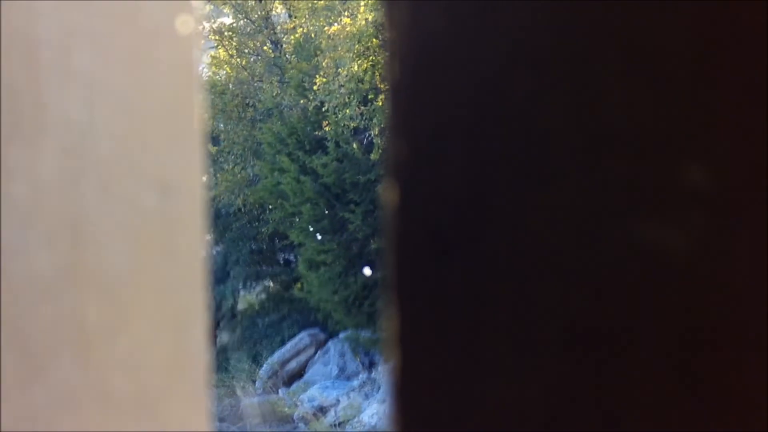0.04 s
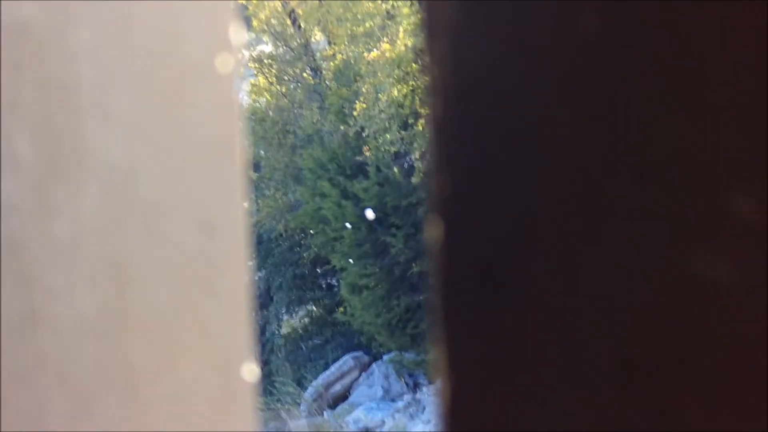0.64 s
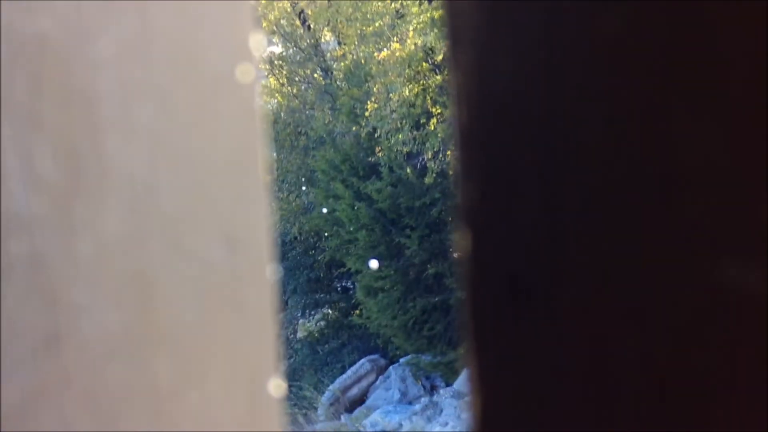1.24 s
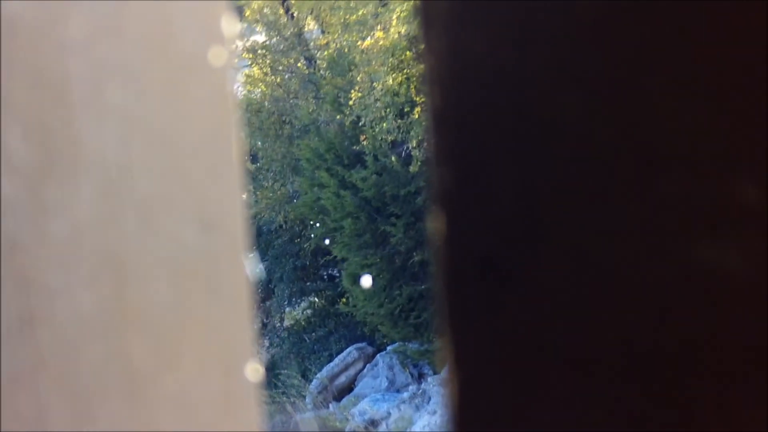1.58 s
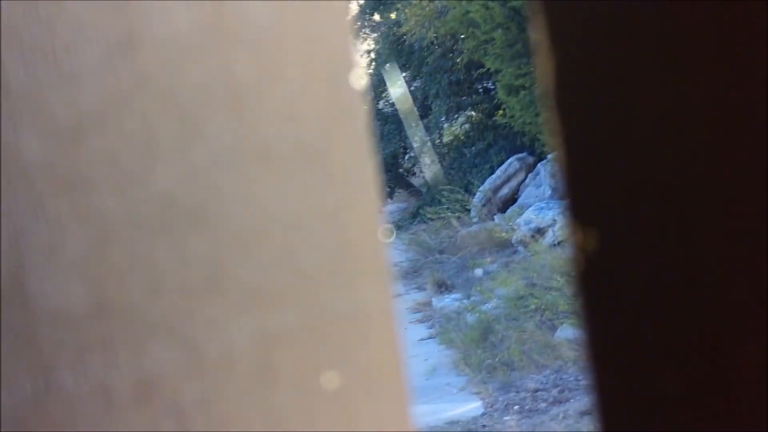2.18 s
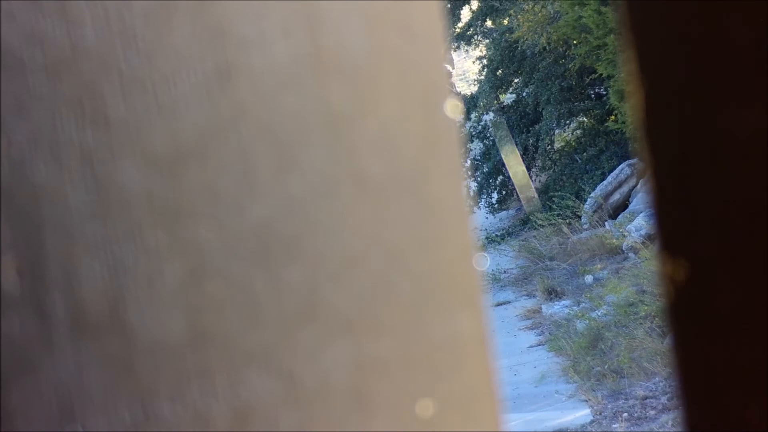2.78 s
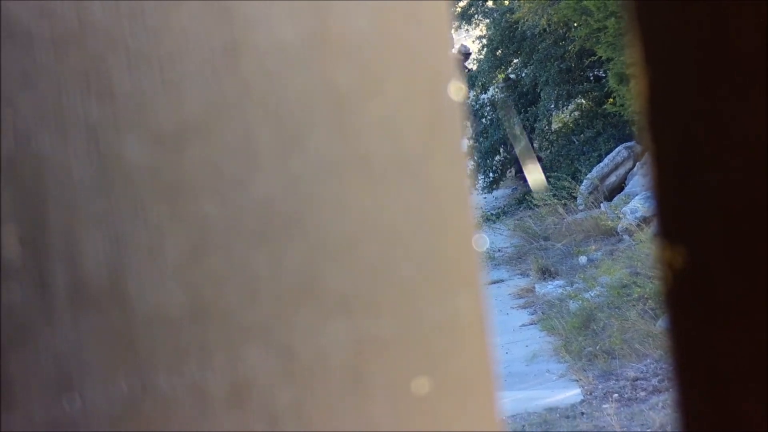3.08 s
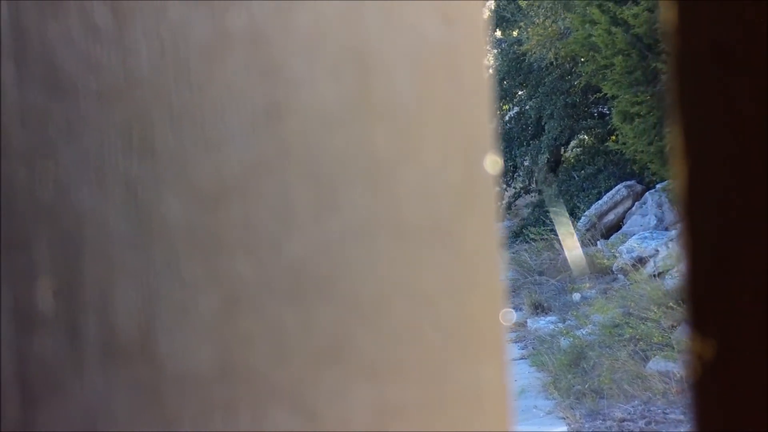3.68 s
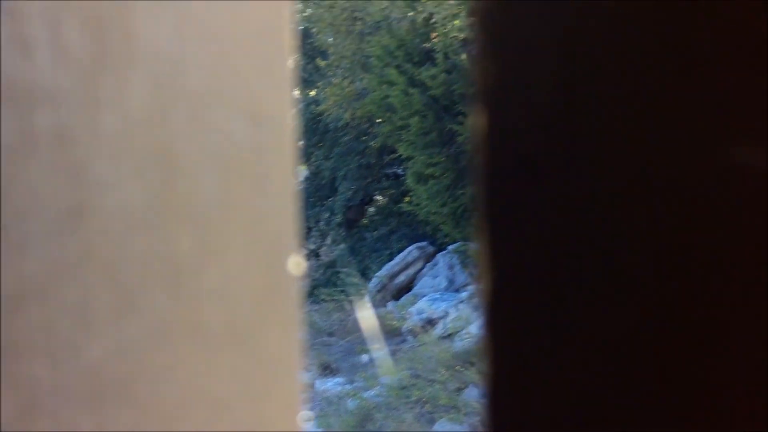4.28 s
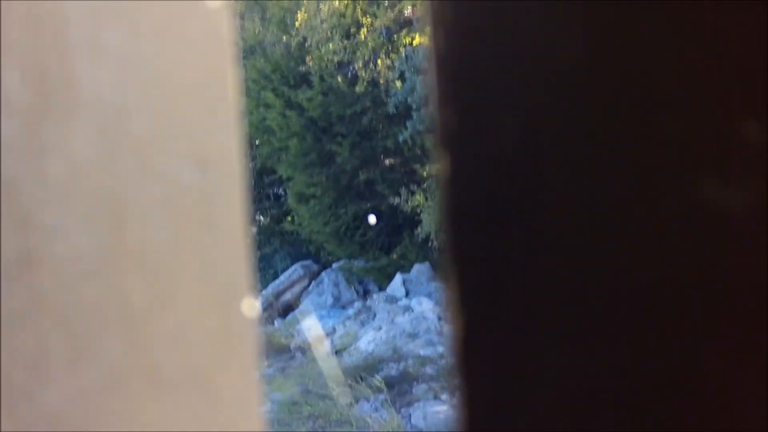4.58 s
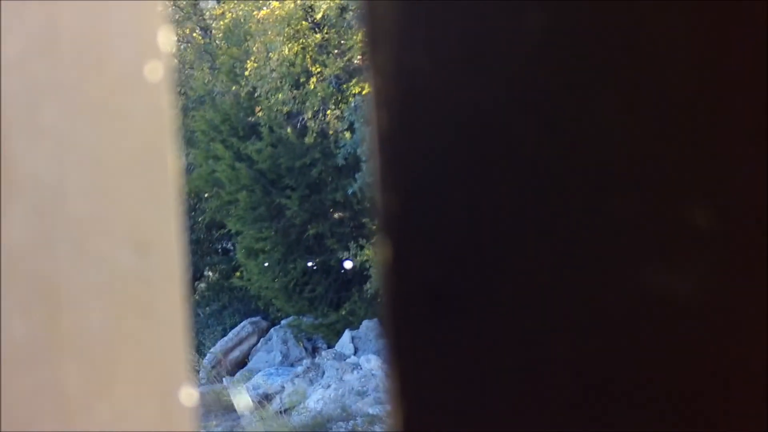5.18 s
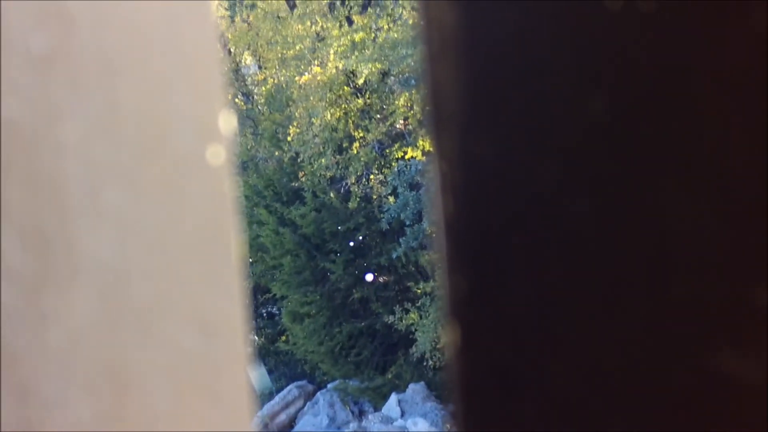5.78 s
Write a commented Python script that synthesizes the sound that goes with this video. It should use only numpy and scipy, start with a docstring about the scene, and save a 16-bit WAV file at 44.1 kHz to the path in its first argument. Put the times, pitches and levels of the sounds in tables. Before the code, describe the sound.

Close, muffled full-auto fire from an electric airsoft gun stops, distant shots patter through the building, then the near gun fires again.

```python
"""An electric airsoft gun is firing full-auto out of a bare room, beside a muffled camera microphone.
Each cycle the gears wind the spring, the piston slides and slams, the body rings and a puff of air
thumps the microphone. At 1.7 s the burst ends and the motor coasts down.
From 2 s other guns rattle far off in the building, with a faint falling motor whine.
At 4.5 s the near gun fires a second long burst, to the end."""
import sys
import numpy as np
from scipy import signal
from scipy.fft import rfft, irfft
from scipy.io import wavfile
from scipy.ndimage import uniform_filter1d, minimum_filter1d

SR = 44100
rng = np.random.default_rng(int(sys.argv[2]) if len(sys.argv) > 2 else 0)


def transcribe(u):
    """Save the signal u as a 16-bit wav file named by the first command-line argument.

    u: samples, shape (n,) or (channels, n), limited to [-1, 1]; the rate is SR.
    q: integer samples, one column per channel.
    """
    v = np.clip(np.atleast_2d(u).T, -1, 1)
    q = np.round(v * 32767).astype(np.int16)
    wavfile.write(sys.argv[1], SR, q)


N = 266364
LEAD = SR // 2  # samples before 0 s: the gun is already firing
TIME = np.arange(-LEAD, N) / SR

# near bursts: (first strike [s], base cycle [s], shots [count])
NEAR_BURSTS = [(-.3757, .08654, 25), (4.5223, .08451, 18)]


def strikes(first_s, cycle_s, count, first_extra_s=.0157, sag_s_per_shot=.000039):
    """Strike times [s] of a burst: a long first cycle as the motor spins up, then battery sag."""
    shot = np.arange(count)
    return first_s + shot * cycle_s + first_extra_s * (shot > 0) + sag_s_per_shot * shot * (shot - 1) / 2


def all_strikes():
    """Strike times [s] of both bursts."""
    return np.concatenate([strikes(*row) for row in NEAR_BURSTS])


def piston(gain_db=16.5, ring_db=-43, scatter_db=2.44, jitter_s=.00004,
           rattle_db=-28, rattle_t60_s=.076, slide_db=-32, slide_s=.0065):
    """Each cycle: a scrape, nearly the same knocks and a loose rattle, all ringing the gun body."""
    # gear release to last wall echo: (time after strike [s], relative level [dB], treble [dB])
    knocks = [(-.0082, -22, 12), (-.0048, -12, -8.5), (-.0022, -14, -1), (0, -1, 10.5), (.0012, -8, -0.5),
              (.0056, -7.5, -7), (.0078, -7, -1), (.009, -6.5, -2), (0.0122, -13, -5), (0.017, -15.5, -8.5),
              (.024, -23, 4)]
    # knock spectrum: (frequency [Hz], gain [dB])
    knock_colour = [(60, -38), (150, -21), (300, -2.5), (500, 7.5), (900, 2), (1600, 1.5), (2200, -5.5),
                    (2700, -18.5), (3600, -12), (5000, -19), (12000, -21.5)]
    # gun body: (frequency [Hz], relative level [dB], t60 [s])
    body_modes = [(578, -6, 0.069), (822.7, -4, 0.1), (1045, 3.5, 0.037), (1270, -4, 0.06),
                  (1390, 2.5, 0.017), (1620, 0.5, 0.022), (1785, -18, 0.056), (1891, -11, 0.14),
                  (2260, 1.5, 0.013), (2950, -3, 0.022), (3405, -7, 0.025), (4000, -18, 0.053),
                  (4710, -4, 0.049)]
    force, scrape = np.zeros((2, len(TIME)))
    impulse = signal.unit_impulse(256)
    contacts = [colour(impulse, [(1900, db), (4000, db + treble_db)]) for _, db, treble_db in knocks]
    for strike_s in all_strikes():
        for (lag_s, *_), contact in zip(knocks, contacts):
            late, size = rng.standard_normal(2)
            add(force, strike_s + lag_s + jitter_s * late, undb(scatter_db * size) * contact)
        add(scrape, strike_s, undb(rattle_db) * fade(rattle_t60_s))
        add(scrape, strike_s - slide_s, np.full(int(slide_s * SR), undb(slide_db)))
    force = colour(force + scrape * noise(), knock_colour)
    ring = through(force, modes(body_modes))
    return undb(gain_db) * (force + undb(ring_db) * ring)


def air_puffs(hard_width_s=.00053, jitter_s=.00032):
    """Blunt pressure pulses on the microphone, varying in strength, sign and backswing."""
    # every cycle: (time after strike [s], half width [s], level [dB], scatter [dB], push chance [0-1])
    cycle_puffs = [(-.0035, 0.00072, -22, -2.5, 0.3), (.0026, 0.00061, -5.5, 4, .2),
                   (0.0116, 0.00044, -16, 5, .45)]
    # square hits on the microphone: (time [s], level [dB])
    hard_puffs = [(.163, 5.5), (.249, 1), (0.2573, -1), (0.4331, 2), (0.508, 3.5), (.5177, 5), (0.7738, 6),
                  (1.1274, 0), (1.3746, 8), (1.738, 8), (4.525, 4), (4.6336, -1), (4.8789, 2), (5.3871, 7),
                  (5.6436, 6)]
    puffs = [(time_s, hard_width_s, -undb(db)) for time_s, db in hard_puffs]
    for strike_s in all_strikes():
        for lag_s, width_s, db, scatter_db, push_chance in cycle_puffs:
            late, size = rng.standard_normal(2)
            sign = 1 if rng.random() < push_chance else -1
            puffs.append((strike_s + lag_s + jitter_s * late, width_s, sign * undb(db + scatter_db * size)))
    out = np.zeros(len(TIME))
    window_s = np.arange(-SR // 100, SR // 100) / SR
    for time_s, width_s, gain in puffs:
        pulse = np.exp(-(window_s / width_s) ** 2 / 2)
        backswing = rng.standard_normal() * window_s / width_s
        add(out, time_s + window_s[0], gain * (1 + backswing) * pulse)
    return out


def motor(wind_up_s=.057, let_go_s=.085, spin_up_s=.04, coast_s=1.1, coast_db_per_s=55):
    """Trigger state, speed and sound strength: the motor spins up while held, then coasts."""
    held, speed, strength = np.zeros((3, len(TIME)))
    for row in NEAR_BURSTS:
        times_s = strikes(*row)
        running_s = np.maximum(TIME - times_s[0] + wind_up_s, 0)
        coasting_s = np.maximum(TIME - times_s[-1] - let_go_s, 0)
        spin = 1 - np.exp(-running_s / spin_up_s)
        started = running_s > 0
        held += started & (coasting_s == 0)
        speed = np.where(started, spin * np.exp(-coasting_s / coast_s), speed)
        strength += spin ** 2 * undb(-coast_db_per_s * coasting_s)
    return uniform_filter1d(held, size=900), speed, strength


def gears(mesh_hz=1604, grind_db=-32.5, whine_db=-42, low_gear_db=-3, sag=.0902, load_db=2):
    """Teeth grind while the trigger is held; two mesh tones sag under the spring and sink on coasting."""
    # grind spectrum: (frequency [Hz], gain [dB])
    gear_colour = [(60, -35.5), (150, -28), (300, -1), (600, -3.5), (1100, 2.5), (1600, 5), (2250, 1.5),
                   (2700, -7.5), (3300, -7), (3650, -8.5), (4000, -1.5), (4500, -3.5), (5000, -9.5),
                   (12000, -31)]
    held, speed, strength = motor()
    times_s = all_strikes()
    cycle_phase = np.interp(TIME, times_s, np.arange(len(times_s))) % 1
    load = held * (cycle_phase - .5)  # the spring tightens between strikes
    hz = mesh_hz * speed * (1 - sag * load)
    tones = whine(hz, width_hz=250) + undb(low_gear_db) * whine(hz / 2, width_hz=70)
    teeth = unit(colour(noise() * flutter(db=2.5, hold_s=.0029), gear_colour))
    return strength * (undb(grind_db + load_db * load) * held * teeth + undb(whine_db) * tones)


def ticks(gain_db=12):
    """Latch, trigger and pellets: short hard clacks of varied brightness."""
    # (time [s], relative level [dB], t60 [s], treble [dB])
    clacks = [(0.184, -24.5, 0.037, 2.5), (0.272, -30.5, 0.1, 8), (1.829, -31, .06, -2),
              (1.842, -30, 0.092, -9), (4.46, -44, .06, 6), (4.471, -32, 0.038, -21.5)]
    # clack spectrum: (frequency [Hz], gain [dB])
    clack_colour = [(100, -30), (400, 3), (1200, 3), (2300, 1.5), (3000, -13), (5000, -5), (12000, -19)]
    out = np.zeros(len(TIME))
    for time_s, db, t60_s, treble_db in clacks:
        clack = colour(noise_decay(t60_s), [(2500, .0077), (9000, treble_db)])
        add(out, time_s, undb(db + gain_db) * clack)
    return colour(out, clack_colour)


def room(x, early_db=-14, early_t60_s=.093, late_db=-15.5, late_t60_s=2.2, delay_s=.012):
    """Close bare walls answer at once; the building rings on, duller."""
    # wall reflections: (frequency [Hz], gain [dB])
    wall_colour = [(70, -16), (160, 2.5), (280, -9), (2000, 0), (5000, -4.5)]
    # building tail: (frequency [Hz], gain [dB])
    tail_colour = [(70, -20.5), (160, 5), (300, 0), (600, 1), (900, -3), (2000, -6), (5000, -8.5)]
    response = np.zeros(3 * SR)
    for db, t60_s, outline in [(early_db, early_t60_s, wall_colour), (late_db, late_t60_s, tail_colour)]:
        tail = noise_decay(t60_s)
        tail /= np.linalg.norm(tail)
        response[int(delay_s * SR):][:len(tail)] += undb(db) * colour(tail, outline)
    return through(x, response)


def far_guns(shot_db=10, tail_t60_s=.34, knock_db=1, knock_t60_s=.14, crack_t60_s=.011,
             whirr_db=-3, whirr_t60_s=1.55, whirr_rise_s=.051):
    """Shots in other rooms: a small crack, a hollow knock, a reverberant swell, and a lingering whirr as the
    building rings on."""
    # (relative level [dB], crack [dB], room boom [dB], attack blur [s], shot times [s])
    far_bursts = [(-45, 0, 1, 0.013, (2.021, 2.18, 2.32, 2.465, 2.589, 2.687, 2.758, 2.878, 3.001, 3.139, 3.258, 3.39)),
                  (-51, -18, -13, 0.027, (3.93, 3.99, 4.166, 4.255, 4.345, 4.415))]
    # shot spectrum: (frequency [Hz], gain [dB])
    shot_colour = [(60, -48), (140, -5), (300, -7.5), (500, -11.5), (800, 3), (1200, 3.5), (1900, -2),
                   (2500, -13), (3050, -13), (3400, -16), (4050, -5), (4400, -10), (6000, -17.5)]
    # whirr spectrum: (frequency [Hz], gain [dB])
    whirr_colour = [(60, -35), (130, -17.5), (220, -9), (340, -2), (410, -2), (570, 1.5), (700, -5),
                    (900, -2), (1500, -1), (2100, -10.5), (3000, -18), (3500, -22.5), (4000, -13.5),
                    (5500, -25), (9000, -36)]
    # rung by a knock: (frequency [Hz], width [Hz], relative level [dB])
    hollows = [(409, 91, -1), (580, 70, -7.5), (1164, 60, -11), (3050, 160, -19), (4040, 130, -15)]
    # of the building: (frequency [Hz], width [Hz], relative level [dB])
    standing_waves = [(219, 26, -13), (580, 29, -28)]
    grain = noise() * flutter(db=-1, hold_s=.008)
    knock = undb(knock_db) * resonances(hollows)
    whirr = unit(colour(noise(), whirr_colour))
    boom = resonances(standing_waves)
    out = 0
    for db, crack_db, boom_db, blur_s, times_s in far_bursts:
        crack = undb(crack_db) * far_envelope(times_s, crack_t60_s, rise_s=1 / SR)
        swell = far_envelope(times_s, tail_t60_s, blur_s)
        shots = undb(shot_db) * colour((crack + swell) * grain, shot_colour)
        knocks = far_envelope(times_s, knock_t60_s, blur_s) * knock
        linger = undb(whirr_db) * far_envelope(times_s, whirr_t60_s, whirr_rise_s)
        out += undb(db) * (shots + knocks + linger * (whirr + undb(boom_db) * boom))
    return out


def far_envelope(times_s, t60_s, rise_s):
    """Far shots summed in power; many paths blur each attack."""
    power, decay = np.zeros(len(TIME)), fade(t60_s)
    attack = np.minimum(np.arange(len(decay)) / (rise_s * SR), 1)
    for time_s in times_s:
        add(power, time_s, (attack * decay) ** 2)
    return np.sqrt(power)


def far_motor(gain_db=-1):
    """A distant motor whines as it runs down."""
    # (time [s], frequency [Hz], relative level [dB])
    run_down = [(2.7, 1051, -62), (3.05, 1001, -55.5), (3.33, 966, -51), (3.57, 968, -56.5),
                (3.7, 950, -60.5), (4.1, 914, -69)]
    times_s, hz, db = np.transpose(run_down)
    tone = whine(np.interp(TIME, times_s, hz), width_hz=55)
    return undb(np.interp(TIME, times_s, db) + gain_db) * tone


def undb(db):
    """Decibels to gain."""
    return 10 ** (np.asarray(db) / 20)


def unit(x):
    """Scale to rms 1."""
    return x / np.sqrt(np.mean(x ** 2))


def noise():
    """White noise over the whole scene."""
    return rng.standard_normal(len(TIME))


def add(track, time_s, x):
    """Mix x into the track from time_s on."""
    start = max(int(round(time_s * SR)) + LEAD, 0)
    part = track[start:start + len(x)]
    part += x[:len(part)]


def through(x, response):
    """Pass x through an impulse response."""
    return signal.fftconvolve(x, response)[:len(x)]


def colour(x, outline, size=2048):
    """Minimum-phase filter from (frequency [Hz], gain [dB]) points."""
    hz, db = np.transpose(outline)
    bins_hz = np.maximum(np.arange(size // 2 + 1) * SR / size, 1)
    gain = undb(np.interp(np.log(bins_hz), np.log(hz), db))
    cepstrum = irfft(np.log(gain))
    cepstrum[1:size // 2] *= 2
    cepstrum[size // 2 + 1:] = 0
    return through(x, irfft(np.exp(rfft(cepstrum))))


def fade(t60_s):
    """Envelope falling 60 dB."""
    return np.exp(-np.log(1000) * np.arange(int(t60_s * SR)) / (t60_s * SR))


def noise_decay(t60_s):
    """Dying noise, 3 s at most."""
    envelope = fade(t60_s)
    return rng.standard_normal(3 * SR)[:len(envelope)] * envelope


def whine(hz, width_hz):
    """A tone whose level and phase waver over a narrow band."""
    lowpass = signal.butter(2, width_hz / 2, fs=SR, output="sos")
    waver = signal.sosfilt(lowpass, noise() + 1j * noise())
    carrier = np.exp(2j * np.pi * np.cumsum(hz) / SR)
    return unit(np.real(waver * carrier))


def modes(table):
    """Impulse response of damped modes, 3 s long."""
    t = np.arange(3 * SR) / SR
    return sum(undb(db - 60 * t / t60_s) * np.cos(2 * np.pi * hz * t) for hz, db, t60_s in table)


def resonances(table):
    """Noise ringing in narrow bands."""
    return sum(undb(db) * whine(np.full(len(TIME), hz), width_hz) for hz, width_hz, db in table)


def flutter(db, hold_s):
    """Gain wandering by db rms, smoothed over hold_s."""
    return undb(db * unit(uniform_filter1d(noise(), int(hold_s * SR))))


def scene():
    """The near gun in its room, its puffs on the microphone, and the far guns."""
    gun = piston() + gears() + ticks()
    return (gun + room(gun) + air_puffs() + far_guns() + far_motor())[None]


def record(dry, notch_hz=688, notch_width_hz=58, ceiling=.55, hiss_db=-93,
           peak=.85, limiter_s=.004, top_hz=15700):
    """The microphone's position hollows a narrow band near 700 Hz; shots overload it;
    its cover muffles the treble; a limiter holds the peaks."""
    # covered microphone: (frequency [Hz], gain [dB])
    mic_colour = [(20, -5), (2200, 4.5), (3200, 3), (4400, -10), (5100, -10.5), (5700, -21.5), (6500, -39),
                  (7050, -31.5), (7500, -36.5), (8100, -28), (8900, -24), (9600, -33.5), (11500, -36),
                  (13500, -66.5)]
    notch = signal.iirnotch(notch_hz, notch_hz / notch_width_hz, fs=SR)
    hollowed = signal.lfilter(*notch, dry[0])
    overloaded = ceiling * np.tanh(hollowed / ceiling)
    muffled = colour(overloaded, mic_colour) + undb(hiss_db) * noise()
    size = int(limiter_s * SR)
    gain = minimum_filter1d(peak / np.maximum(np.abs(muffled), peak), 2 * size)
    limited = muffled * uniform_filter1d(uniform_filter1d(gain, size), size)
    lowpass = signal.ellip(8, .2, 70, top_hz, fs=SR, output="sos")
    return signal.sosfilt(lowpass, limited)[None, LEAD:]


dry = scene()
out = record(dry)
transcribe(out)
```